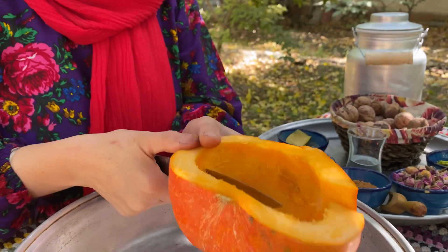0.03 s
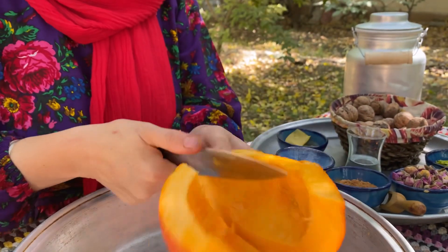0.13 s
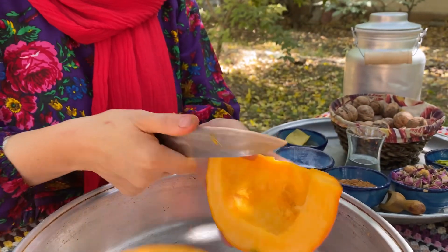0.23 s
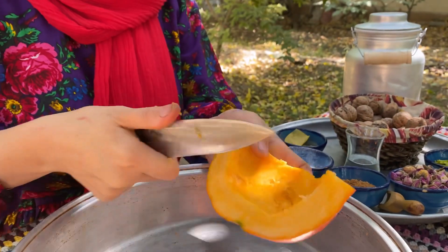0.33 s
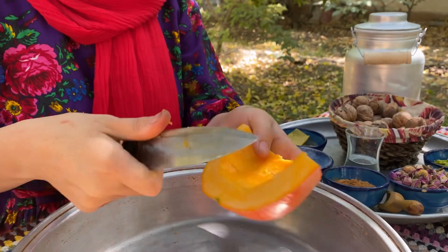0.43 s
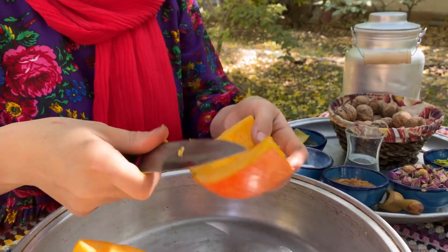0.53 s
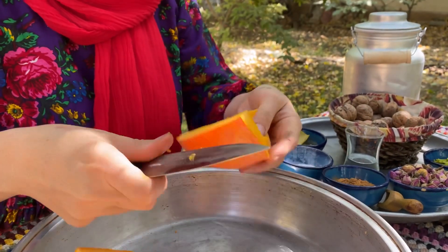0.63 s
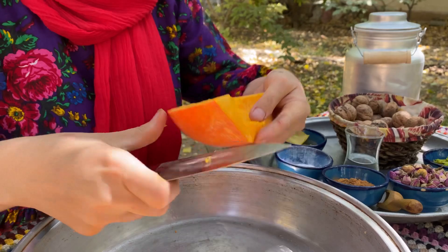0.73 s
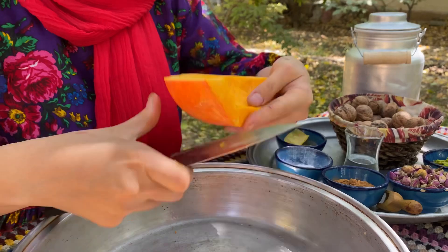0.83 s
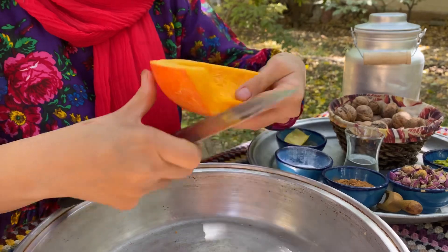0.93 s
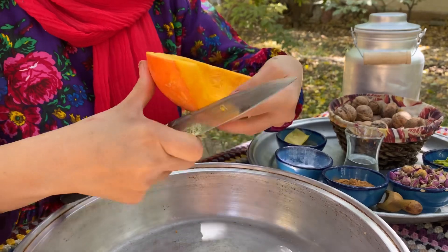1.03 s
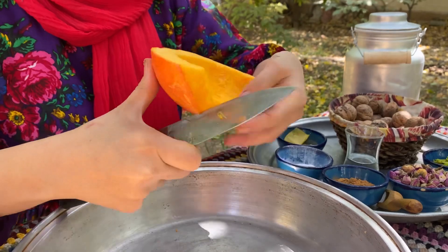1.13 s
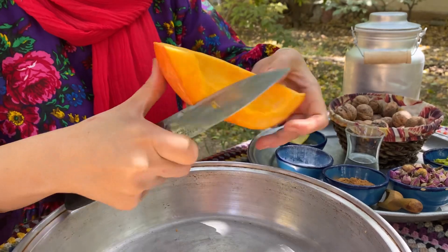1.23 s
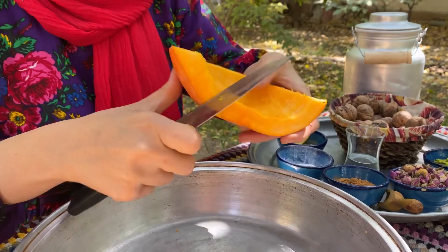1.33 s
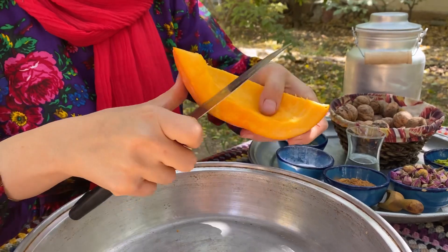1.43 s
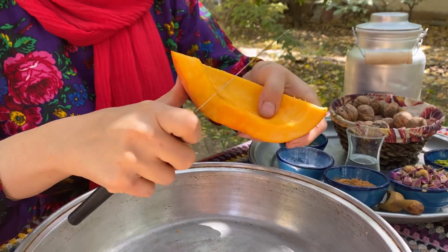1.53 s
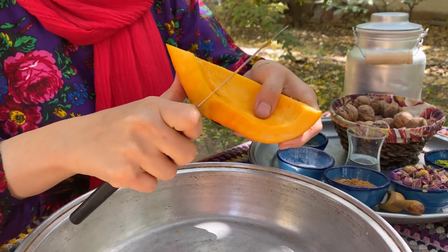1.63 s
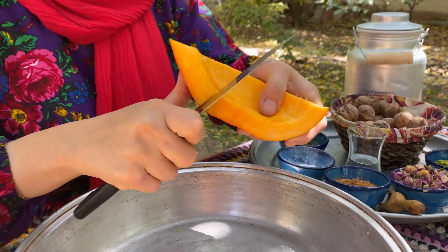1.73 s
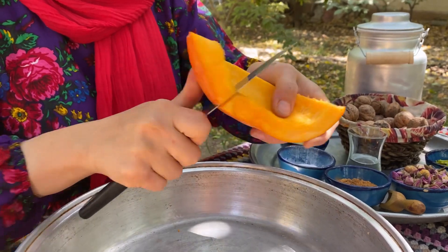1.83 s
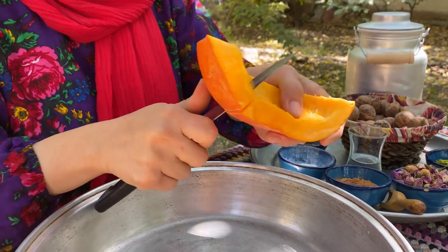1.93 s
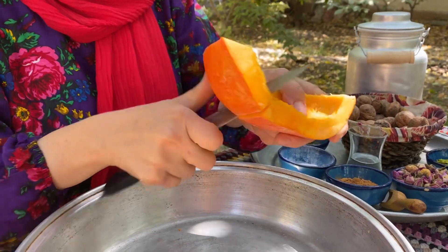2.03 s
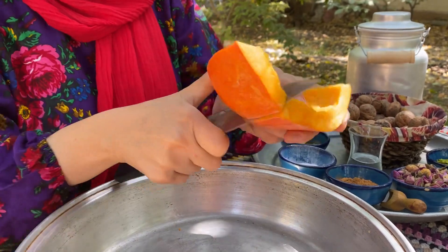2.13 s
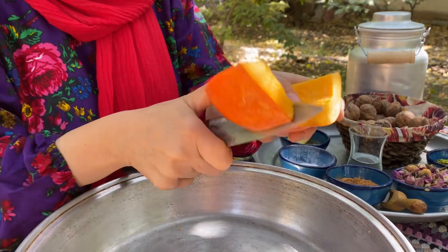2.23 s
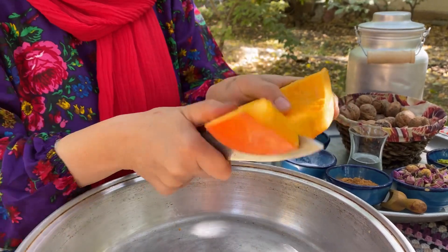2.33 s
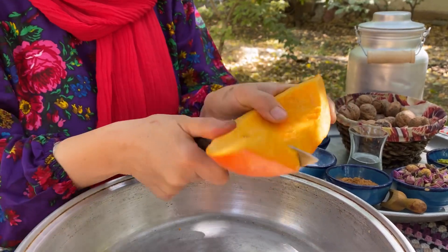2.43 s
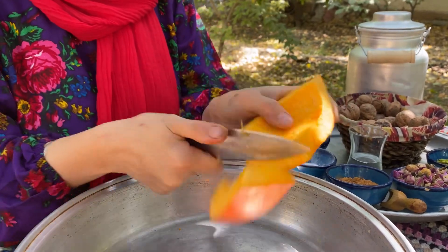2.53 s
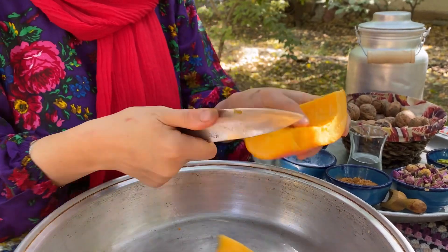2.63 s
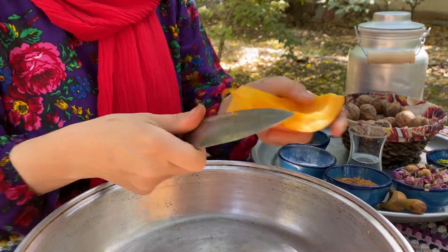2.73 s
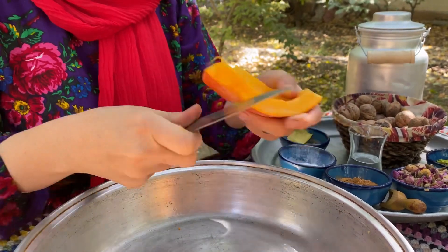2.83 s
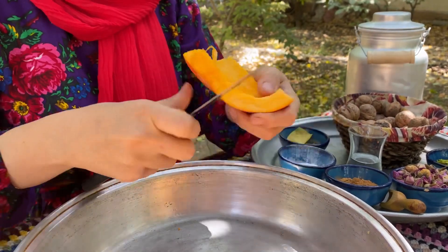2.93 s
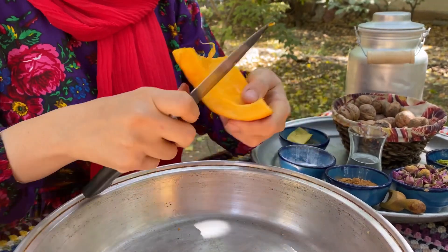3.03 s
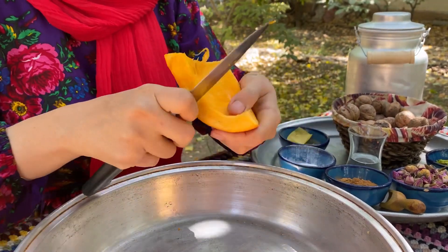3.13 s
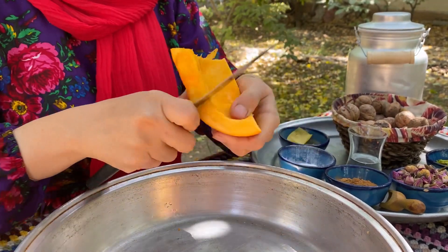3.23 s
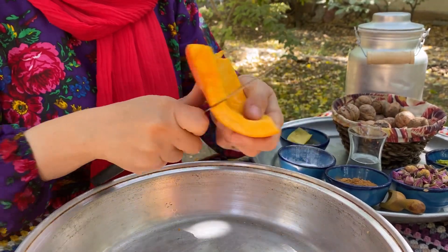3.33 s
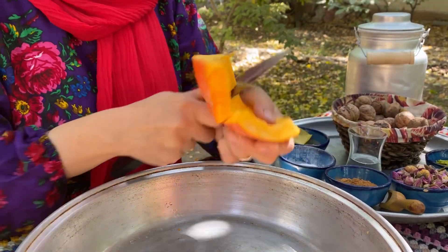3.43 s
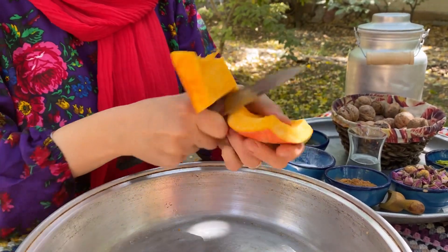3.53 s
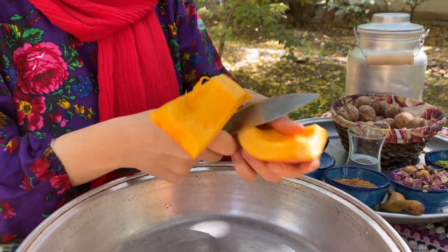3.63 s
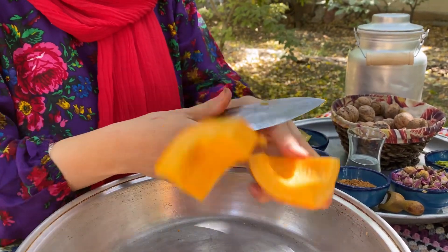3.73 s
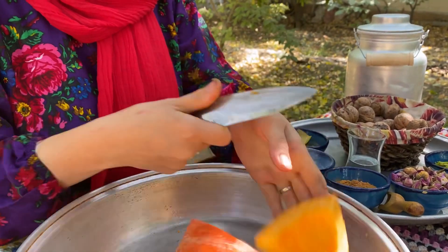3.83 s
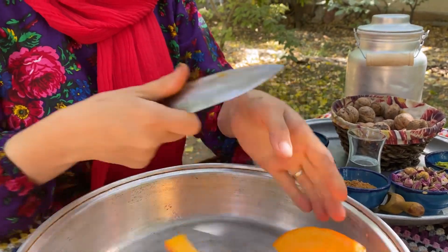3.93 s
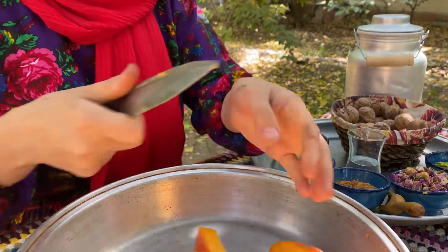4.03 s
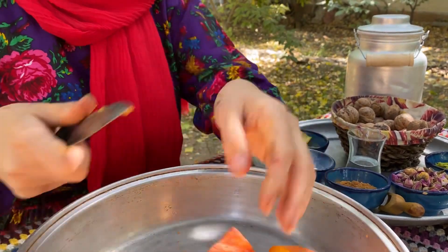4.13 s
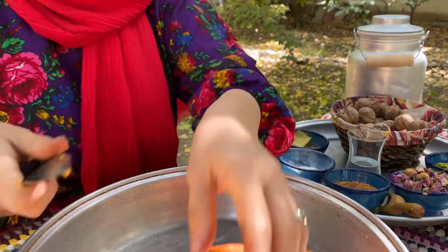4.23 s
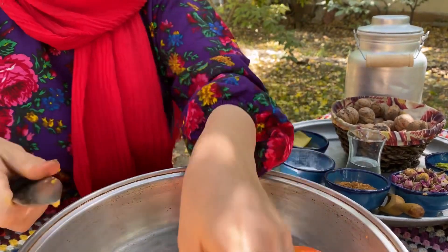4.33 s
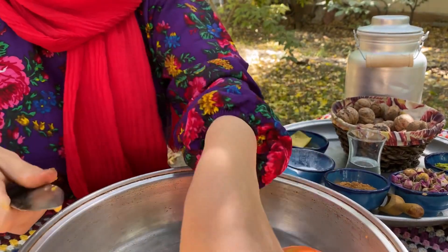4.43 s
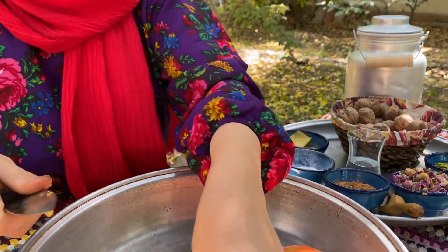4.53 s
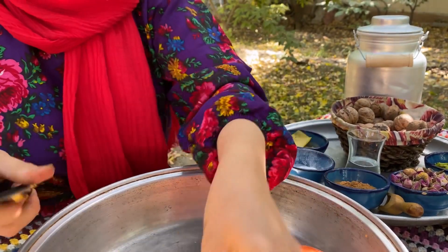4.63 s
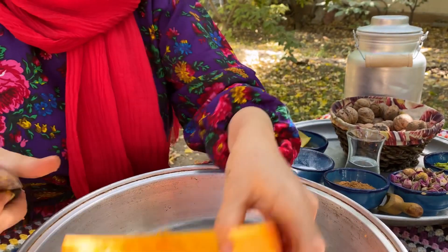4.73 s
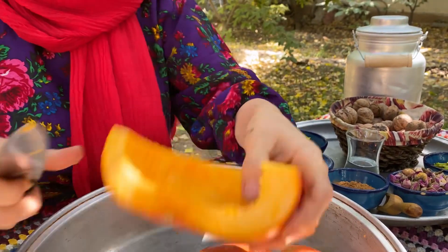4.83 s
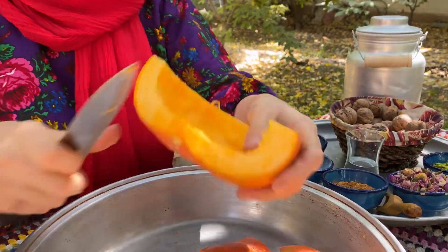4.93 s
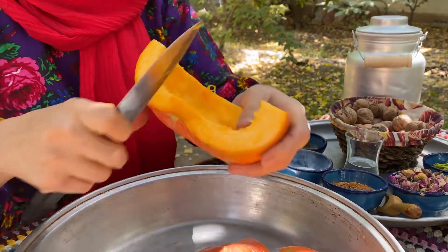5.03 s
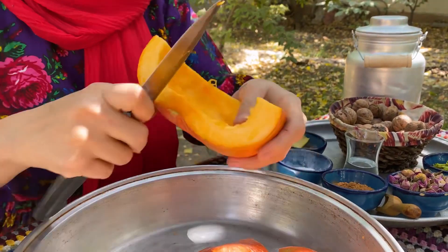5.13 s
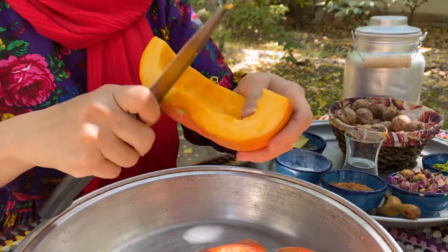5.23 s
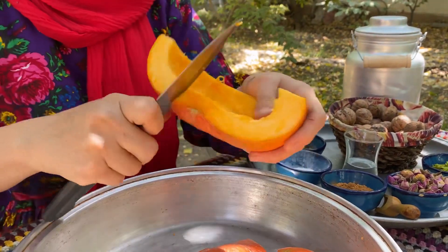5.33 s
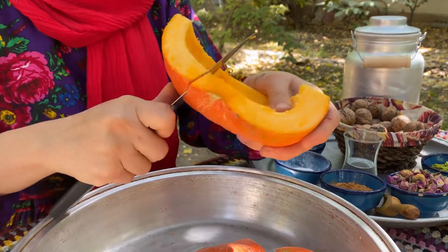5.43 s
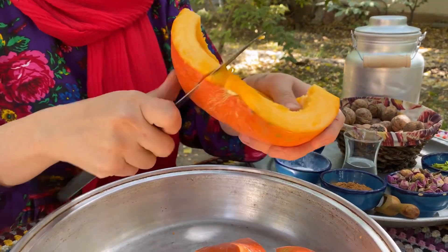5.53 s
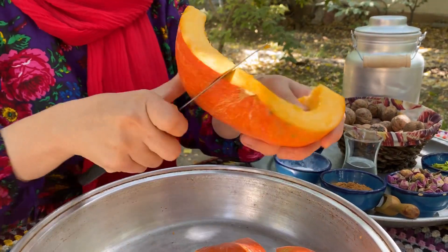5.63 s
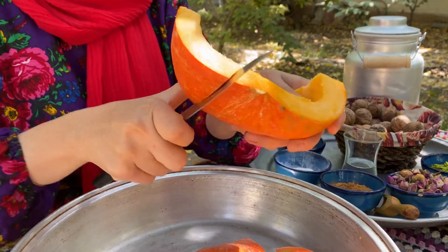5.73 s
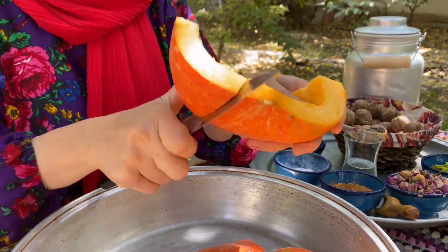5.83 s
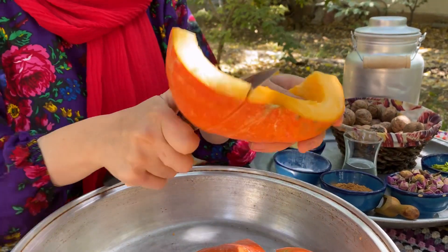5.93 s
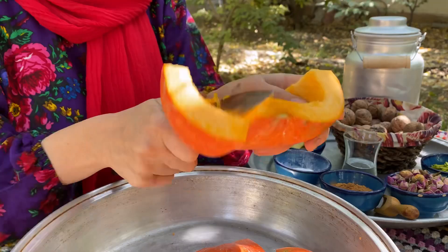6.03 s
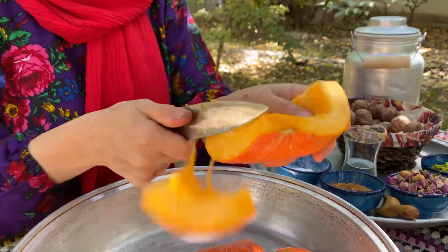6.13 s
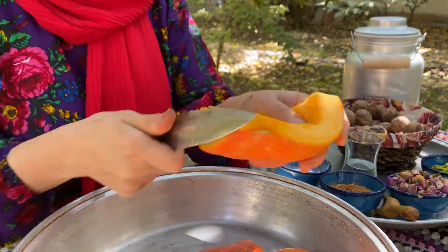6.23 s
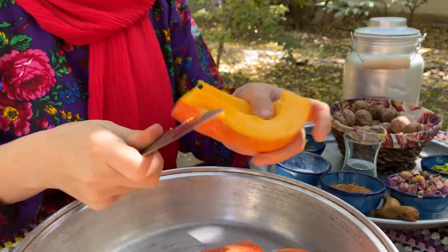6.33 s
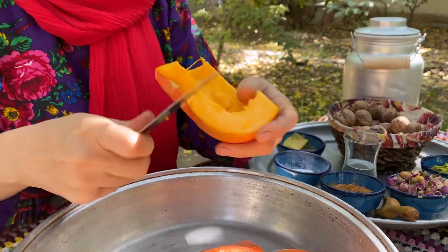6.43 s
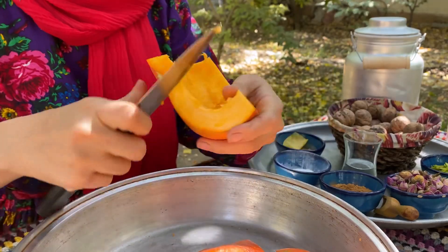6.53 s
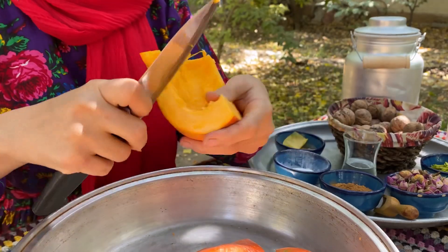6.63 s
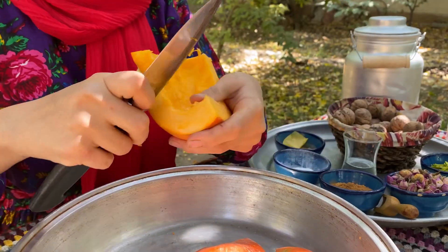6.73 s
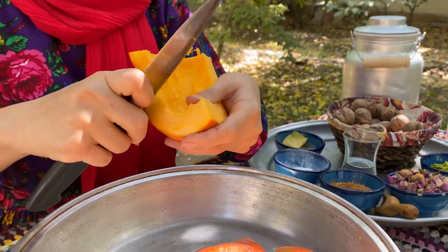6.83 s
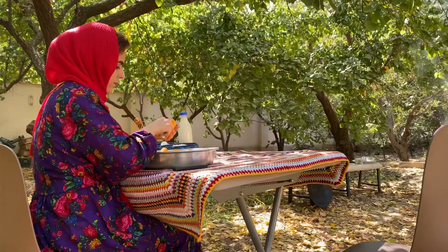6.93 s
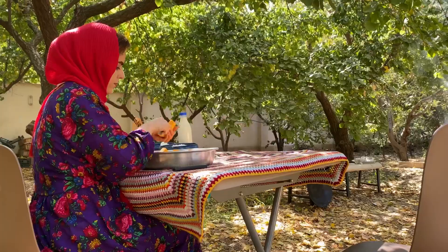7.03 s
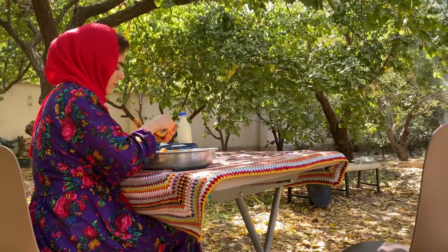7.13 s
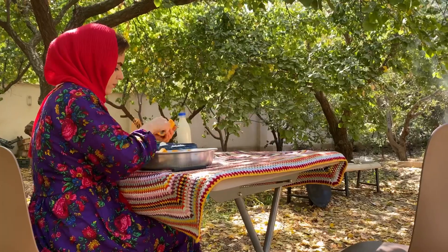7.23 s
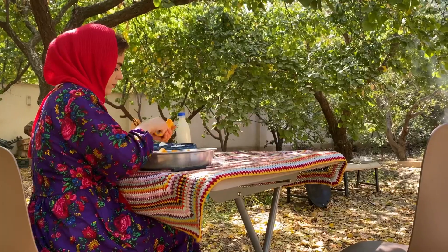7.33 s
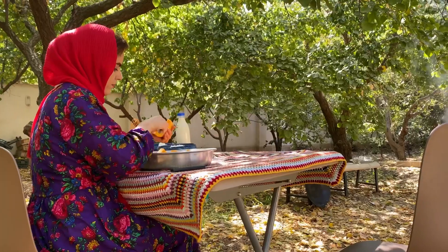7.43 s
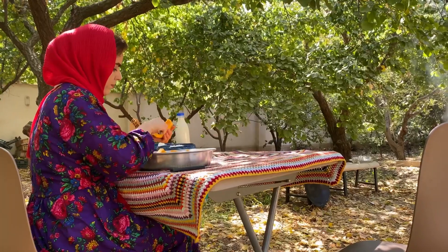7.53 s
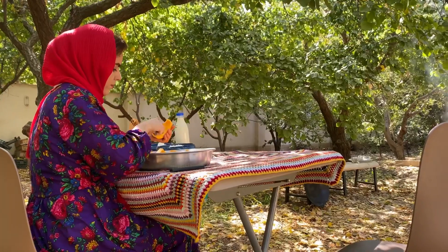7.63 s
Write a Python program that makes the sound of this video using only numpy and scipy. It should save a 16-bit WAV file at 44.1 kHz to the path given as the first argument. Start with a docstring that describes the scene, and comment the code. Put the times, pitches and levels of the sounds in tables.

```python
"""A kitchen knife splits raw pumpkin held in the hand over a wide steel basin on a garden table.
Bursts of filtered noise make the crunch of wet cells, the snapping fibres and the creak of tearing flesh.
Sums of decaying modes ring the knocking knife and the basin as chunks tumble into it.
Swelling low sines thud the table under the chunks; shaped noise makes the quiet garden air."""
import sys
import numpy as np
from scipy import signal
from scipy.fft import rfft, irfft, next_fast_len
from scipy.io import wavfile
from scipy.ndimage import uniform_filter1d

SR = 44100
rng = np.random.default_rng(int(sys.argv[2]) if len(sys.argv) > 2 else 0)


def put_to_file(sound):
    """Save the sound as 16-bit audio at rate SR, in the file named by the first command-line argument."""
    columns = np.atleast_2d(sound).T  # one column per channel
    safe = np.clip(columns, -1, 1)
    whole_steps = np.round(safe * 32767)
    wavfile.write(sys.argv[1], SR, whole_steps.astype(np.int16))


N = 338247
T = np.arange(int(.4 * SR)) / SR  # time axis of one event, s

# Spectra of the open garden air, before and after the background drops: f/Hz, relative level per Hz/dB
EARLY_AIR = [(15, -42), (25, -13), (76, -7), (145, -14.5), (293, -19.5), (354, -27), (911, -34.5),
             (2160, -35), (2760, -39), (6210, -48), (7310, -53.5), (16000, -80)]
LATE_AIR = [(15, -60.5), (25, -19), (127, -4), (195, -14), (249, -10.5), (326, -19.5), (363, -18),
            (6560, -42.5), (16000, -67)]
EARLY_AIR_DB, LATE_AIR_DB = -52, -58.5  # before the waver
CHANGE_S = 6.93  # the background drops abruptly to the later air here

# The blade slips a little way and sticks again: t/s, length/s, treble level/dB
JERKS = [(0.018, 0.0054, -37), (0.056, 0.018, -33.5), (1.705, 0.008, -53.5), (1.747, 0.012, -44.5),
         (1.79, 0.014, -44.5), (2.322, 0.008, -47), (2.367, 0.0076, -56), (2.427, 0.013, -58),
         (2.493, 0.0095, -45.5), (3.299, 0.023, -42), (5.804, 0.013, -48.5), (5.874, 0.012, -45),
         (5.962, 0.014, -39), (6.05, 0.025, -53)]
JERK_EDGE_S, JERK_DEPTH_DB = 0.012, -1  # attack and release; gain of the low crunch
# The blade runs through: t/s, length/s, final treble level/dB, build-up/dB (negative: easing),
# depth/dB (gain of the low crunch)
SLICES = [(1.823, 0.072, -44.5, -1.5, -21), (1.996, 0.075, -49.5, 11, 28), (3.213, 0.043, -47, 3, 3),
          (3.327, 0.095, -41, 2, 7), (5.36, 0.058, -44.5, 3, -4), (5.913, 0.03, -43, -2.5, -1)]
SLICE_EDGE_S = 0.012  # attack and release
# Wet flesh sliding lightly on steel or skin: t of the middle/s, length/s, treble level/dB, depth/dB
RUBS = [(0.393, 0.27, -56, 5.5), (0.812, 0.22, -63, 30), (3.5, 0.4, -68.5, 6), (5.347, 0.21, -65.5, 4),
        (6.374, 0.08, -59, -7), (7.21, 0.34, -63.5, -14)]
# Spectrum of bursting cells: f/Hz, relative level per Hz/dB
CRUNCH = [(150, -27), (480, -3.5), (950, 0.5), (1650, 4.5), (2300, 2), (2900, -5.5), (5000, -2), (6300, -2),
          (7500, -7.5), (10000, -10), (12500, -10.5), (16000, -25.5)]

# Chunks landing in the basin: t/s, ring level/dB, hardness/dB (clack over ring), f of the contact/Hz,
# weight/dB (thud over ring)
DROPS = [(0.186, -7.5, -13.5, 988, -2.5), (0.271, -24.5, -11.5, 498, 10), (0.395, -42.5, -10, 820, 14),
         (0.457, -38, -19.5, 520, 13), (0.478, -36.5, -11.5, 840, 15.5), (0.644, -39.5, -21.5, 470, 11.5),
         (0.686, -47, -23, 517, 10), (0.956, -51, -9.5, 453, 17), (2.602, -28, -9, 595, 7.5),
         (2.6617, -24, -13.5, 897, 5), (2.682, -15.5, -21.5, 890, -11), (2.768, -44, -7, 1200, -15),
         (2.78, -9.5, -14, 1060, -6), (2.798, -23.5, -14, 1032, -4.5), (2.841, -28.5, -15, 1000, 1.5),
         (3.8282, -22.5, -10.5, 634, 6.5), (3.849, -17, -10, 1125, -2), (3.8701, -13.5, -20.5, 840, -17),
         (3.895, -30.5, -12, 1077, 14), (3.926, -47, -11, 850, -4), (3.942, -35, -12, 710, 9),
         (4.014, -34, -15.5, 653, 8), (4.069, -23.5, -27, 456, -2), (4.205, -54, -3.5, 650, 14.5),
         (4.268, -51, -4, 655, 7), (4.721, -41.5, -11.5, 915, 10), (6.103, -46, -30, 400, -10),
         (6.22, -7, -6.5, 448, -3.5), (6.23, -12, -12.5, 692, 0.5), (6.343, -35, -9.5, 914, 3),
         (6.362, -38, -11, 800, -1), (6.3776, -36, -18.5, 940, 7), (6.394, -46, -15, 685, 14)]
# Modes of the steel basin before scatter and load: f/Hz, relative level/dB, t60/s
BASIN = [(250, -11.5, 0.061), (458, 4.5, 0.028), (554, -18.5, 0.05), (631, -2, 0.055), (680, -1.5, 0.084),
         (815, -5.5, 0.11), (912, -2.5, 0.035), (1094, -4, 0.14), (1373, -13.5, 0.12), (1550, -4.5, 0.025),
         (1756, -16.5, 0.14), (1795, -16, 0.18), (1970, -29.5, .06), (2282, -12.5, 0.08),
         (2655, -18.5, 0.17), (2900, -20.5, 0.08), (3040, -23.5, 0.11), (3218, -26.5, .08),
         (4280, -30, 0.062)]
# Pieces lying in the basin damp it: from t/s, factor on its t60
LOADED_S, LOADED_RING = 4.1, .8
# Spectrum of the rattle of a blow: f/Hz, relative level per Hz/dB
CONTACT = [(100, -16.5), (220, -7.5), (340, -19.5), (480, -2), (1000, -7), (1600, -13.5), (3000, -23),
           (5500, -21), (7500, -23), (9000, -42.5), (16000, -46.5)]
DROP_TICK_DB, KNOCK_TICK_DB = -13.5, -13.5  # treble tick of a blow over its clack
TOP_HZ = 15950

TABLE_HZ, THUD_SWELL_S = 73, .013  # a landing sets the table top swinging
THUD_LAG_S = 0.0053  # thud after contact
ROCK_S, ROCK_DB = .057, -23.5  # one rocking back: time after the thud, level over the thud
# Dull bumps against the table, without the basin's ring: t/s, level of the swing/dB, f/Hz, swell/s
BUMPS = [(0.206, -18.5, 70.4, 0.011), (0.751, -30.5, 139, 0.013), (0.762, -23, 80, 0.014),
         (0.79, -30, 69.7, 0.024), (1.14, -35, 64, 0.01), (1.293, -38.5, 60, 0.017),
         (1.927, -41, 65, 0.028), (3.884, -16.5, 105, 0.0065), (4.269, -35.5, 74, 0.017),
         (5.385, -36, 78.6, 0.013), (6.356, -21.5, 70, 0.015), (6.372, -23.5, 165, 0.028),
         (6.388, -38, 116.5, 0.024)]

# The blade knocking on the pumpkin or breaking through: t/s, ring level/dB, hardness/dB (clack over ring),
# f of the piece/Hz, relative level of the piece/dB, factor on the blade's t60, f of the free blade/Hz
KNOCKS = [(0.304, -39.5, -11.5, 517, -13, 0.73, 2960), (0.764, -30.5, 0, 1100, -4.5, 1.5, 2200),
          (0.775, -33, -15, 1060, 3, 0.7, 2500), (0.788, -30, 0, 498, 4, 0.6, 2343),
          (0.836, -48, -31, 757, 0, 0.77, 2230), (0.867, -47, -5.5, 494, 7, 1.1, 2570),
          (1.912, -20.5, -3, 977, 10, 0.75, 1428), (2.024, -36, -11, 1094, 0, 1.5, 1580),
          (2.041, -27.5, -9, 750, 8, 0.35, 1600), (2.047, -27.5, -11.5, 1140, -6.5, 0.95, 1330),
          (2.057, -15.5, -8.5, 1103, 8.5, 0.86, 2990), (2.96, -27, -7, 1118, -11, 0.94, 2630),
          (3.056, -49, -13, 870, 4, 0.41, 1480), (3.211, -21, -13.5, 974, -1.5, 1.42, 1284),
          (3.335, -32, -18.5, 470, 5, 0.4, 1440), (3.433, -41, -16, 607, 5, 0.48, 1210),
          (5.373, -21.5, -7, 712, 13, 0.62, 2262), (5.377, -22.5, -26, 394, -1, 0.49, 2360),
          (5.436, -50.5, -2, 1050, -8, 1.1, 2200), (5.998, -28.5, -9, 651, 5, 0.76, 2390),
          (6.481, -28.5, 1.5, 915, -9, 1.12, 2243), (6.5495, -29, -1.5, 950, -9.5, 0.9, 2423)]
# Modes of the knife, with the basin's answer, before scatter and damping: f/Hz, relative level/dB, t60/s
KNIFE = [(190, -17, .06), (450, -2, 0.084), (530, -14, 0.03), (680, -5, 0.056), (838, -9, 0.023),
         (1100, -7, 0.13), (1310, -15, 0.04), (935, -8, 0.22), (1448, -10, 0.1), (1760, -19, 0.07),
         (2020, -19, 0.06), (2250, -7, 0.07), (2560, -18, 0.09), (3400, -20, 0.08), (3600, -20, .08),
         (4205, -9, 0.1), (4960, -8, 0.11), (5340, -17, 0.08)]
# Modes of the bare blade pinging once, before scatter: f/Hz, relative level/dB, t60/s
BLADE = [(2640, -8, 0.12), (4100, -17, 0.14), (4600, -14, 0.25), (5470, -14.5, 0.41)]
PIECE_T60, FREE_BLADE_DB, FREE_BLADE_T60 = 0.039, -5, 0.075  # each knock's own modes; blade t60 undamped
KNIFE_LOWEST_HZ = 144  # the hand soaks up what is deeper
PING_S, PING_DB = 3.9705, -47

# Single fibres and bits of rind cracking: t/s, level/dB, depth/dB (gain of the low crunch)
CRACKS = [(1.29, -50, 19), (1.477, -46, 23.5), (1.805, -42, -17), (1.865, -49, -5), (1.8914, -42, -4),
          (1.948, -41, -1), (3.377, -30.5, 15), (3.3826, -25, 22), (3.389, -23.5, 13), (3.3956, -29.5, 15),
          (3.399, -20.5, 14), (3.4052, -17.5, 13), (3.473, -46, -10), (3.59, -43.5, -15.5),
          (5.399, -44, -6), (5.936, -37, -5), (5.9443, -38, -7), (5.954, -37, 0), (5.9845, -38, 3),
          (5.994, -43, 0), (6.012, -45, -13), (6.044, -49, -4)]
SPLIT_HZ, SPLIT_WIDTH_HZ, SPLIT_DB = 1720, 350, 8  # the open split, rung by deep cracks

# The flesh tears ahead of the wedged blade: t/s, length/s, level/dB, f of the split/Hz, bandwidth/Hz
TEARS = [(1.988, .058, -39, 1610, 130), (3.352, .058, -33, 1730, 380)]
TEAR_BUILD_DB = 17  # growth from start to end


def undb(db):
    """Logarithmic level: decibels to amplitude gain."""
    return 10 ** (np.asarray(db) / 20)


def fade(t60):
    """Exponential decay: 60 dB are lost in t60 seconds."""
    return np.exp(-np.log(1000) * T / t60)


def band(x, lo_hz, hi_hz):
    """Band selection by a causal Butterworth filter."""
    sos = signal.butter(3, [lo_hz, min(hi_hz, SR / 2 - 1)], "band", fs=SR, output="sos")
    return signal.sosfilt(sos, x)


def colour(x, points):
    """Spectral shaping: weight the sound by a curve of (f/Hz, level/dB) points on a log-frequency axis."""
    hz, db = np.transpose(points)
    size = next_fast_len(x.shape[-1])
    f = np.maximum(np.fft.rfftfreq(size, 1 / SR), 1)
    gain = undb(np.interp(np.log(f), np.log(hz), db))
    return irfft(rfft(x, size) * gain, size)[..., :x.shape[-1]]


def level(x, db):
    """Short-time power: set the loudest 5 ms of the stereo mean to an RMS level."""
    power = uniform_filter1d(x.mean(axis=0) ** 2, size=220, mode="constant")
    return x * undb(db) / np.sqrt(power.max())


def noise(count, spread):
    """Interaural decorrelation: stereo white noise, spread being the size of the part that differs."""
    mid, side = rng.standard_normal((2, count))
    return np.array([mid + spread * side, mid - spread * side])


def add(out, s, x):
    """Superposition: mix a sound in at a time."""
    i = max(0, int(s * SR))
    out[:, i:i + x.shape[-1]] += x[:, :N - i]


def garden(waver_db=1.5):
    """Broadband ambience: faint air over a low rumble, its level wavering; at a set time it abruptly turns
    weaker."""
    t = np.arange(N) / SR
    early, late = colour(noise(N, 0.58), EARLY_AIR), colour(noise(N, 0.74), LATE_AIR)
    early = early / early.std() * undb(EARLY_AIR_DB)
    late = late / late.std() * undb(LATE_AIR_DB)
    air = np.where(t < CHANGE_S, early, late)
    count = N // 4096
    waver = np.interp(t, np.linspace(0, t[-1], count), rng.standard_normal(count))
    return air * undb(waver_db * waver)


def flesh(x, depth_db):
    """Low-frequency weighting: a deeper cut sounds more of the piece and of the opening split."""
    x = colour(x, CRUNCH)
    body = signal.sosfilt(signal.butter(1, 2600, fs=SR, output="sos"), x)
    return x + (undb(depth_db) - 1) * body


def cells(depth_db, slip_db, cells_per_s=4000):
    """Random impulse process: cells burst over a wet hiss, unevenly as the edge sticks and slips."""
    count = len(T)
    cell_db, juice = 5.5, .35  # spread of burst sizes; hiss against bursts
    sizes = undb(cell_db * np.minimum(rng.exponential(size=count), 3))
    sizes = rng.choice([-1, 1], count) * sizes
    bursts = (rng.random(count) < cells_per_s / SR) * sizes
    sides = 1 + 0.3 * rng.standard_normal(count) * np.array([[1], [-1]])
    bursts = bursts / bursts.std() * sides
    x = flesh(bursts + juice * noise(count, 1.0), depth_db)
    x = x / band(x, 3400, 16000).std()  # the treble sets the level
    slips = np.interp(T, np.linspace(0, T[-1], count // 96), rng.standard_normal(count // 96))
    return x * undb(slip_db * slips)


def push(length_s, edge_s):
    """Force envelope: linear attack, hold and exponential release of a stroke."""
    return np.minimum(T / edge_s, 1) * np.exp(-np.maximum(T - length_s, 0) / edge_s)


def swell(t, length_s):
    """Raised-cosine envelope: a smooth rise and fall that starts at t = 0."""
    return np.sin(np.pi * np.clip(t / length_s, 0, 1)) ** 2


def cutting():
    """Stick-slip friction: the blade jerks ahead, then runs through as force changes; pieces rub softly."""
    out = np.zeros((2, N))
    for s, length_s, db in JERKS:
        add(out, s, cells(JERK_DEPTH_DB, slip_db=-0.5) * push(length_s, JERK_EDGE_S) * undb(db))
    for s, length_s, db, build_db, depth_db in SLICES:
        force_db = np.interp(T, [0, length_s], [db - build_db, db])
        add(out, s, cells(depth_db, slip_db=3.0) * push(length_s, SLICE_EDGE_S) * undb(force_db))
    for s, length_s, db, depth_db in RUBS:
        add(out, s - length_s / 2, cells(depth_db, slip_db=-1.0) * swell(T, length_s) * undb(db))
    return out


def ring(modes, scatter_db, spread):
    """Modal superposition: the point struck varies the mode levels; the two sides differ in phase."""
    out = 0
    for hz, db, t60 in modes:
        size, detune, skew = rng.standard_normal(3)
        phase = rng.uniform(0, 2 * np.pi) + spread * np.array([[1], [-1]]) * np.tanh(2 * skew)
        tone = np.sin(2 * np.pi * hz * (1 + 0.0027 * detune) * T + phase)
        out = out + undb(db + scatter_db * size) * fade(t60) * tone
    return out


def resonate(x, hz, width_hz, boost_db):
    """Resonance: whatever rings near the piece's own pitch is lifted."""
    b, a = signal.iirpeak(hz, hz / width_hz, fs=SR)
    return x + undb(boost_db) * signal.lfilter(b, a, x)


def blow(modes, hz, lowest_hz, ring_db, clack_db, tick_db, rattle_db, rattle_t60, own_db, own_width_hz):
    """Impact excitation: modes plus contact rattle; hardness sets the low, middle and high share."""
    rattle = colour(noise(len(T), 0.39), CONTACT)
    rattle = rattle * (fade(rattle_t60) + undb(-23.0) * fade(0.064))
    x = level(ring(modes, scatter_db=2.5, spread=0.3), 0) + level(rattle, rattle_db)
    x = x * (1 - np.exp(-T / 0.00017))  # brief onset
    x = resonate(x, hz, own_width_hz, own_db) * (1 + .5 * fade(0.084))
    # a soft landing only reaches the lower modes
    reach_hz = max(np.interp(clack_db - ring_db, [-28, -16], [650, 1300]), 1.2 * hz)
    low = band(x, lowest_hz, reach_hz)
    middle, high = band(x, 1300, 3400), band(x, 3400, 16000)
    high = high * (1 + 1.5 * fade(0.026))  # extra treble at first touch
    return level(low, ring_db) + level(middle, clack_db) + level(high, tick_db)


def steel(x, wet_db, t60, count=160):
    """Sympathetic vibration: a nearby sound sets the basin's many thin upper modes ringing."""
    hz, phase = rng.uniform(1300, 8500, count), rng.uniform(0, 2 * np.pi, count)
    shimmer = np.sin(2 * np.pi * hz[:, None] * T + phase[:, None]).sum(axis=0) * fade(t60)
    shimmer = shimmer / np.sqrt(np.sum(shimmer ** 2))
    wet = signal.fftconvolve(x, shimmer[None], axes=1)[:, :x.shape[-1]]
    return x + undb(wet_db) * wet


def chunks():
    """Damped shell vibration: pieces of pumpkin hit the basin, damped by their own soft flesh."""
    out = np.zeros((2, N))
    for s, db, hard_db, hz, _ in DROPS:
        clack_db = db + hard_db
        load = LOADED_RING if s > LOADED_S else 1
        modes = [(f, mode_db, t60 * load) for f, mode_db, t60 in BASIN]
        # a small, high-pitched contact misses the deepest modes
        lowest_hz = np.interp(hz, [450, 1000], [300, 620])
        hit = blow(modes, hz, lowest_hz, db, clack_db, clack_db + DROP_TICK_DB,
                   rattle_db=-5.0, rattle_t60=0.082, own_db=8.5, own_width_hz=38)
        add(out, s, hit)
    return steel(out, wet_db=-16.0, t60=0.13)


def thud(db, hz, swell_s, overtone_db=-15, overtone_t60=0.4, shudder_db=-12):
    """Forced oscillation: the table top swings after a load, with a weaker second tone and a shudder."""
    sides = np.array([[.2], [-.2]])  # phase, rad
    envelope = (T / swell_s) ** 0.99 * np.exp(-1.5 * T / swell_s)
    swing = envelope * np.sin(2 * np.pi * hz * T + sides)
    onset = 1 - np.exp(-T / swell_s)
    overtone = onset * fade(overtone_t60) * np.sin(2 * np.pi * rng.uniform(105, 145) * T + sides)
    shudder = band(noise(len(T), 0.13) * fade(0.15), 75, 230)
    return level(swing, db) + level(overtone, db + overtone_db) + level(shudder, db + shudder_db)


def table(pan_db=-2):
    """Structure-borne sound: each landing chunk thuds the table and rocks back once; bumps are added."""
    out = np.zeros((2, N))
    for s, db, _, _, weight_db in DROPS:
        thud_s, thud_db = s + THUD_LAG_S, db + weight_db
        add(out, thud_s, thud(thud_db, TABLE_HZ, THUD_SWELL_S))
        add(out, thud_s + ROCK_S, thud(thud_db + ROCK_DB, TABLE_HZ, THUD_SWELL_S))
    for s, db, hz, swell_s in BUMPS:
        add(out, s, thud(db, hz, swell_s))
    return out * undb(np.array([[pan_db], [-pan_db]]) / 2)


def knife():
    """Damping by contact: the blade jolts and rings less the deeper it is buried; once it rings freely."""
    out = np.zeros((2, N))
    for s, db, hard_db, hz, piece_db, free, blade_hz in KNOCKS:
        blade = KNIFE + [(blade_hz, FREE_BLADE_DB, FREE_BLADE_T60)]
        modes = [(f, mode_db, t60 * free) for f, mode_db, t60 in blade]
        modes = modes + [(hz, piece_db, PIECE_T60)]
        clack_db = db + hard_db
        hit = blow(modes, hz, KNIFE_LOWEST_HZ, db, clack_db, clack_db + KNOCK_TICK_DB,
                   rattle_db=-6.5, rattle_t60=0.073, own_db=-4, own_width_hz=27)
        add(out, s, hit)
    ping = ring(BLADE, scatter_db=1, spread=.6)
    touch = band(noise(len(T), 1.0), 900, 5900) * fade(0.16)
    add(out, PING_S, level(level(ping, 0) / 2 + level(touch, 0), PING_DB))
    return steel(out, wet_db=-8, t60=0.063)


def crack(db, depth_db, t60=0.012, tail_db=-24):
    """Brittle fracture: a tough fibre parts with a dry click."""
    decay = fade(t60) + undb(tail_db) * fade(0.105)
    click = flesh(noise(len(T), 0.36) * decay, depth_db)
    return level(click * fade(0.25), db)


def cracking():
    """Fracture and resonance: fibres snap one after another; deep ones ring the opening split."""
    out = np.zeros((2, N))
    for s, db, depth_db in CRACKS:
        x = crack(db, depth_db)
        if depth_db > 0:
            x = level(resonate(x, SPLIT_HZ, SPLIT_WIDTH_HZ, SPLIT_DB), db)
        add(out, s, x)
    return out


def tearing():
    """Narrow-band stick-slip: the wedged blade tears the flesh and the split creaks ever louder."""
    out = np.zeros((2, N))
    for s, length_s, db, hz, width_hz in TEARS:
        creak = band(cells(0, slip_db=4.0), hz - width_hz / 2, hz + width_hz / 2)
        force_db = np.interp(T, [0, length_s], [-TEAR_BUILD_DB, 0])
        add(out, s, level(creak * push(length_s, JERK_EDGE_S) * undb(force_db), db))
    return out


def scene():
    """Reflection and interaural delay: the crunch bounces off the basin and reaches the left side later."""
    crunch = cutting() + tearing() + cracking()
    bounce = 0.044 * np.roll(crunch, int(.0021 * SR), axis=1)
    left, right = steel(crunch + bounce, wet_db=-16, t60=0.037)
    crunch = np.array([np.roll(left, 12), right])  # it comes from the right; delay in samples
    struck = (chunks() + knife()) * undb([[.5], [-.5]])
    return crunch + struck + table() + garden()


def record(dry):
    """Band limiting and soft saturation: deep rumble drops, high peaks round off and the top is cut."""
    x = signal.sosfilt(signal.butter(3, 36, "high", fs=SR, output="sos"), dry)
    rounded = x / (1 + x ** 8) ** (1 / 8)
    return signal.sosfilt(signal.ellip(8, .2, 70, TOP_HZ, fs=SR, output="sos"), rounded)


dry = scene()
out = record(dry)
put_to_file(out)
```